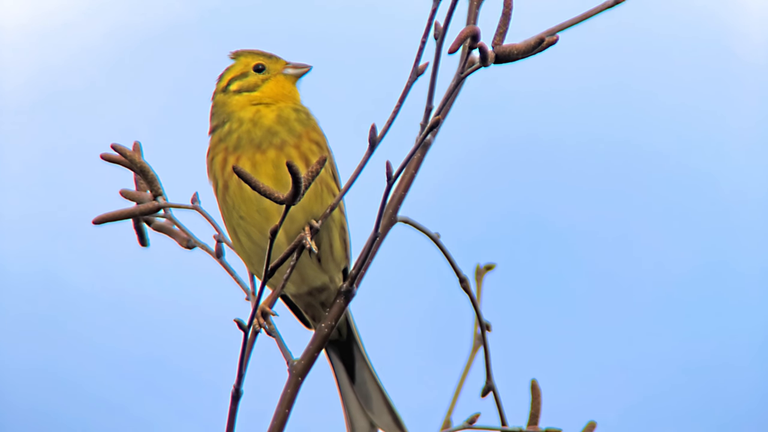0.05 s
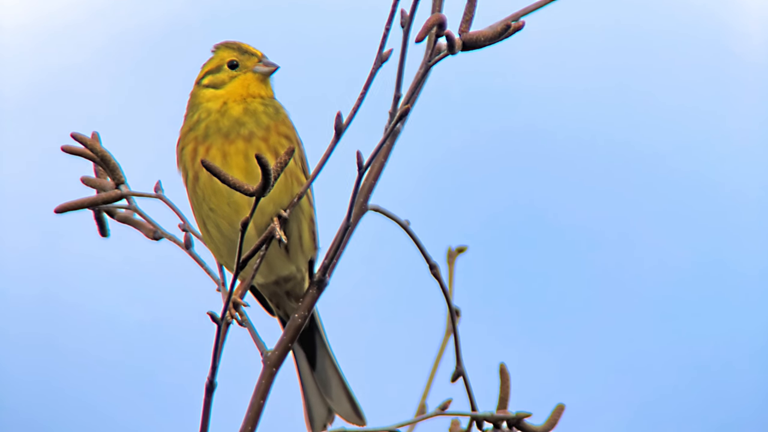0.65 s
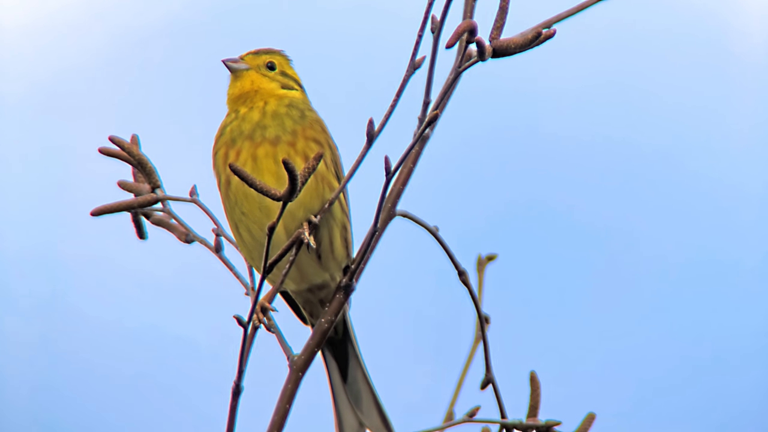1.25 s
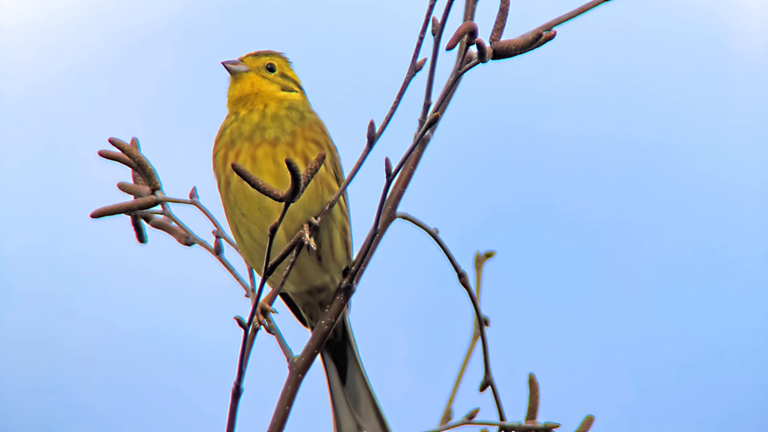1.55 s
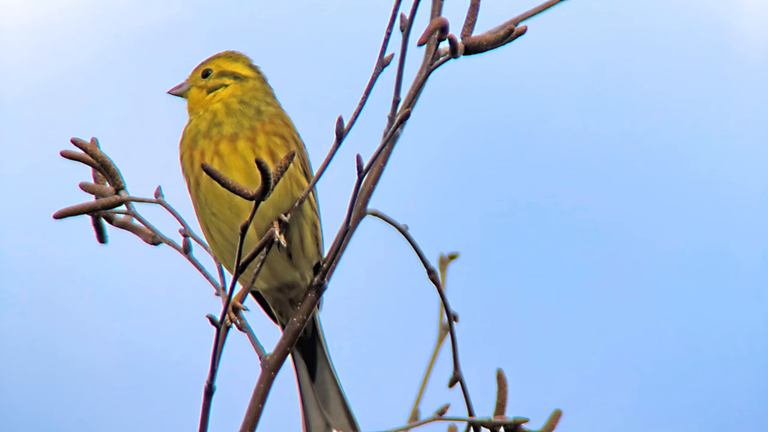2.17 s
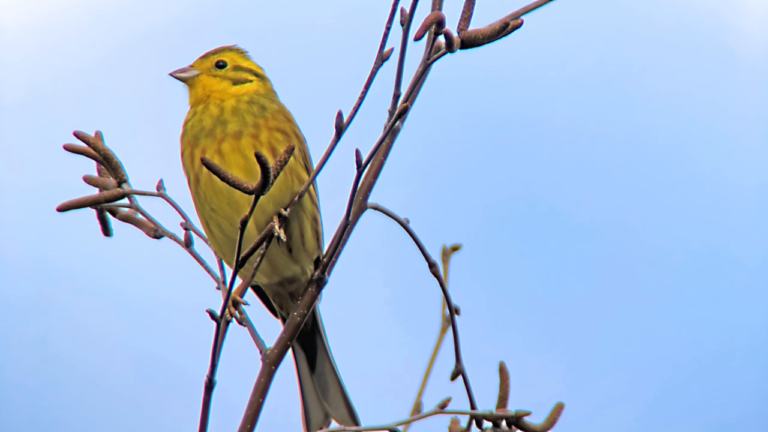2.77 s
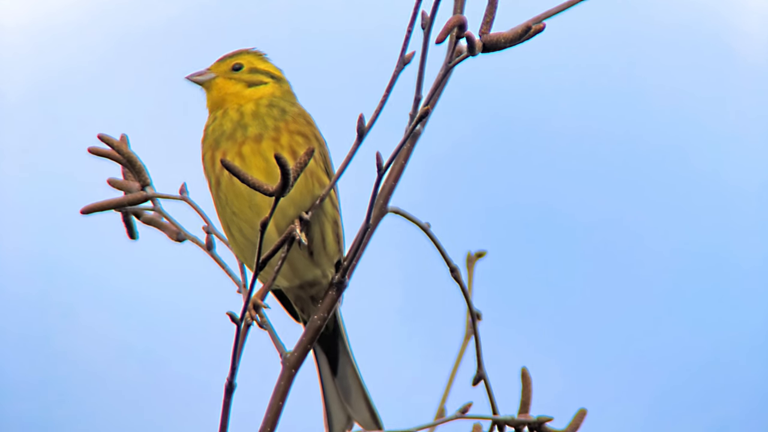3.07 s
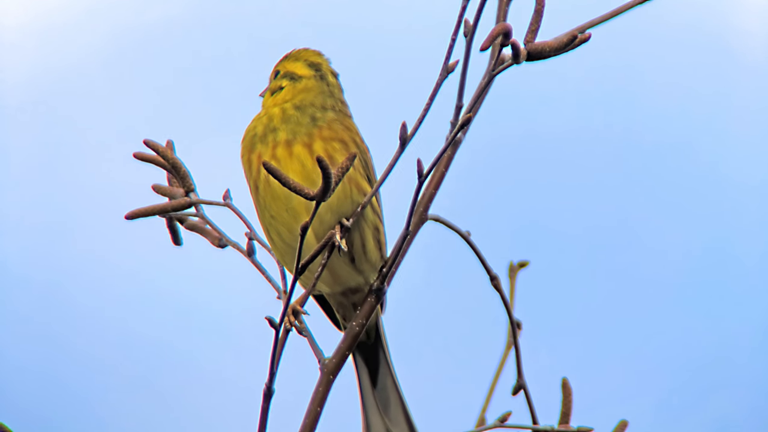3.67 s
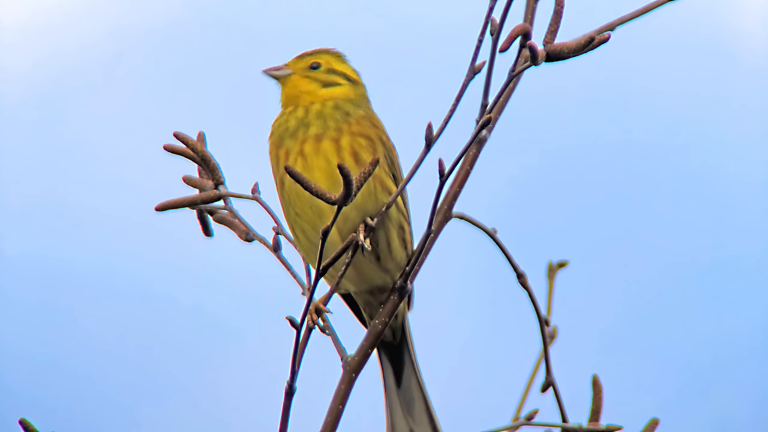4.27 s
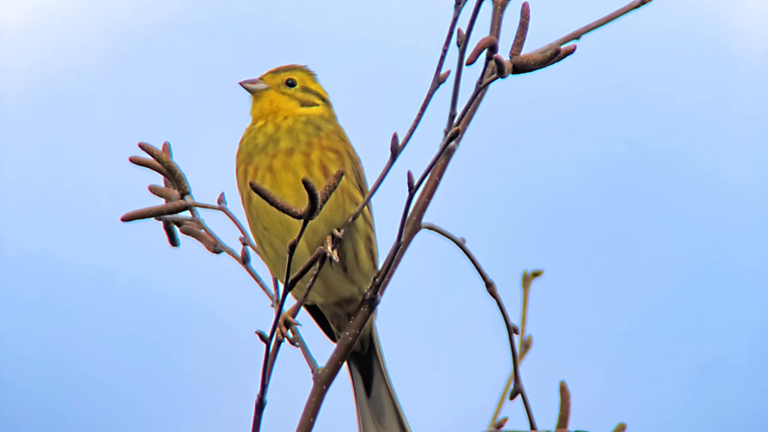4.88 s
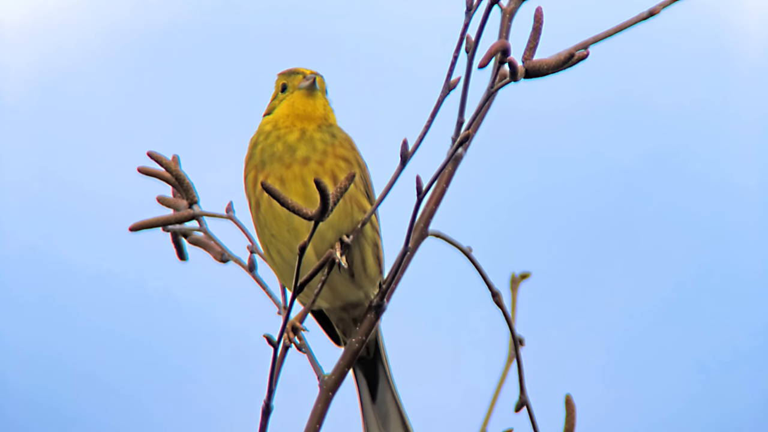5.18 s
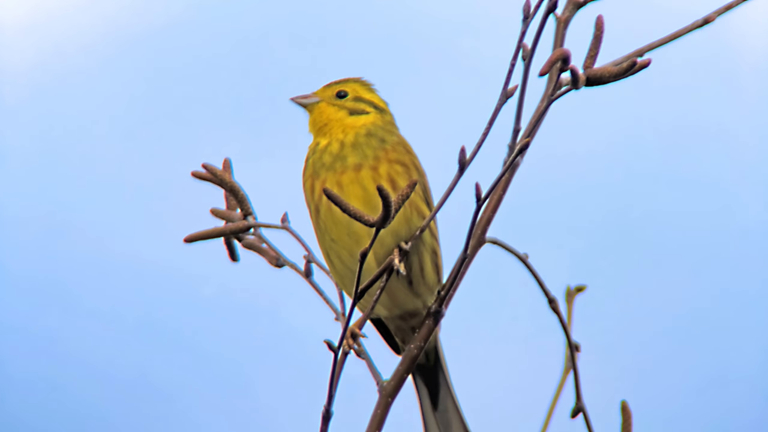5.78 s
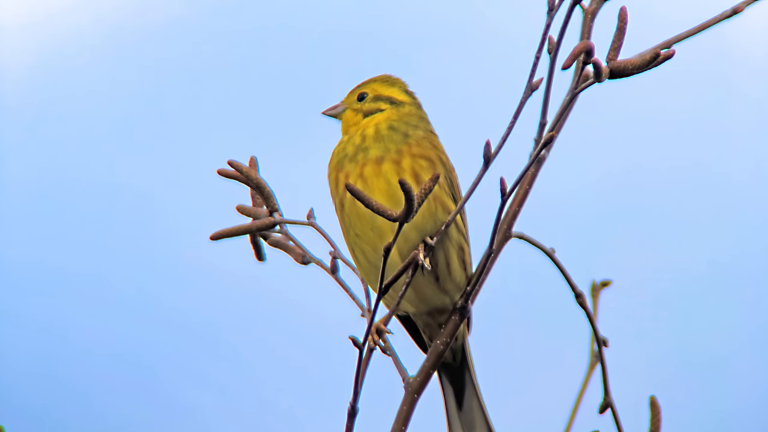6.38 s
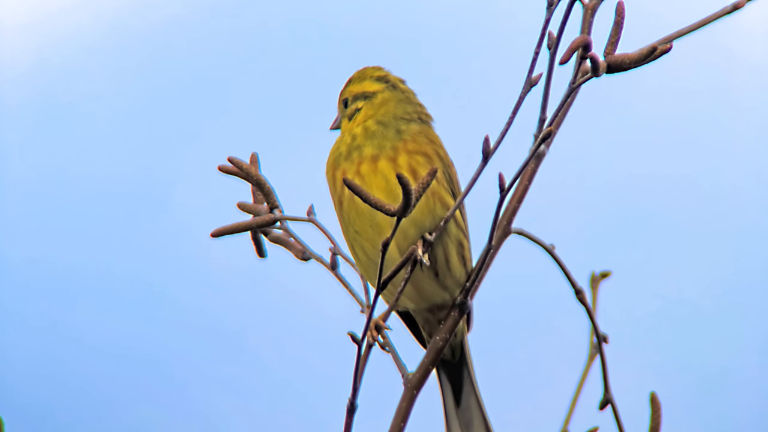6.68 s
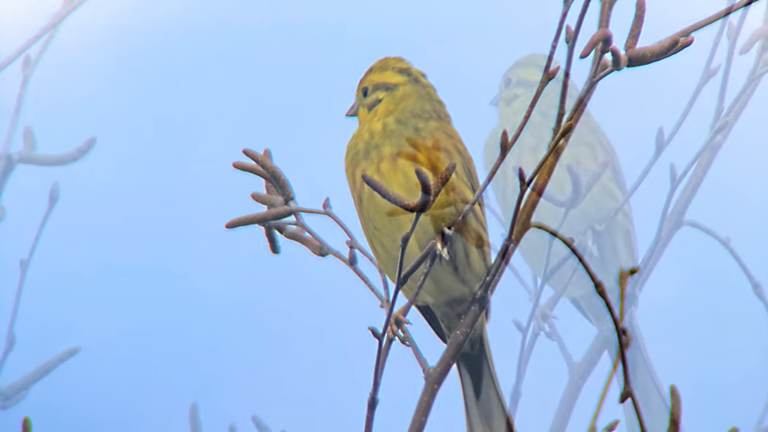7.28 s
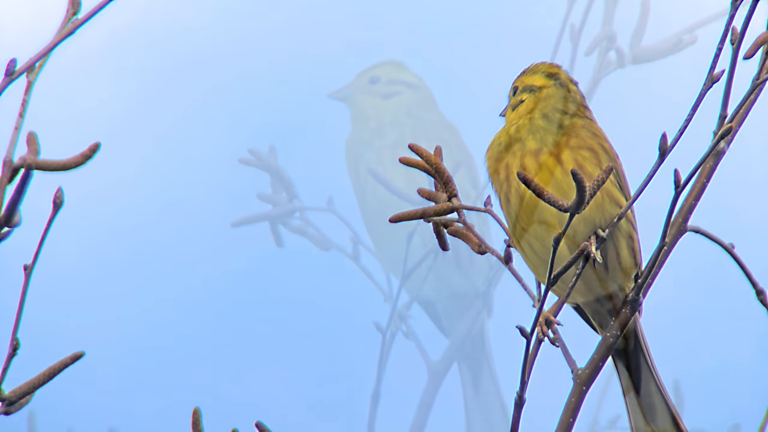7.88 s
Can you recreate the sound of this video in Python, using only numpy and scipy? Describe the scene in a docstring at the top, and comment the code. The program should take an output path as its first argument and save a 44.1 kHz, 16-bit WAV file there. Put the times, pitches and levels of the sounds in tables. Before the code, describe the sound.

A nearby bunting gives six brief buzzy calls, softly echoed by trees and picked up by a single microphone. In the pause after the first, two thin descending whistles and a rapid twitter come from birds further away. Throughout there is a far road, low wind with small puffs and a faint hiss. A distant engine drones louder around the middle, and a single dry click follows the last call.

```python
"""Outdoors among trees, a road far off, one mono microphone. Close by, a yellow bunting on a bare twig
gives six short buzzy calls; each is two beating voices, one from each side of its syrinx. Further off,
other birds add two thin falling whistles, a quick twitter and faint calls; the trees return a soft echo.
Under it lie distant traffic, a far engine's drone, low wind and microphone hiss.
One dry click comes near the end."""
import sys
import numpy as np
from scipy import signal
from scipy.fft import rfft, irfft
from scipy.io import wavfile

SR = 44100
rng = np.random.default_rng(int(sys.argv[2]) if len(sys.argv) > 2 else 0)


def generate_wav(sig):
    """Save sig (samples, or channels by samples) to the path in sys.argv[1] as 16-bit PCM at SR."""
    pcm = np.round(np.clip(np.atleast_2d(sig).T, -1, 1) * 32767).astype(np.int16)
    wavfile.write(sys.argv[1], SR, pcm)


N = 350154
TIME = np.arange(N) / SR

# colours of the wind, the tyres and the microphone: (frequency [Hz], relative density [dB])
WIND_SPECTRUM = [(12, -19.5), (24, -9), (35, -1.5), (48, 1), (62, -7), (80, -6), (102, -5.5), (125, -16),
                 (200, -36.5), (400, -69.5)]
ROAD_SPECTRUM = [(40, -34), (100, 10.5), (150, 7.5), (250, 4.5), (340, -0.5), (550, -0.5), (950, -2),
                 (1300, -9), (1800, -16), (2400, -24), (3500, -32), (6000, -41), (12000, -65)]
HISS_SPECTRUM = [(100, -8), (3000, -8), (6000, -5.5), (10000, -2), (13000, 0.5), (15700, 3)]
# puffs of wind: (peak time [s], length [s], rise of the deep part [dB])
WIND_PUFFS = [(0.41, 0.1, 6), (1.02, 0.21, 6), (2.85, 0.11, 10.5), (3.69, 0.33, 8.5), (4.167, .12, 8),
              (7.77, 0.19, 9)]
# far road and far engine: (time [s], level [dB])
ROAD_SWELLS = [(0, -44.5), (1.3, -42.5), (2.3, -41.5), (3.4, -41.5), (4.3, -42.5), (4.9, -40.5), (5.3, -42),
               (6.8, -42.5), (7.94, -43)]
ENGINE_SWELLS = [(0, -42.5), (1.3, -43), (2.05, -32), (2.6, -36), (3.05, -29.5), (3.73, -30.5),
                 (4.15, -39.5), (4.5, -30.5), (4.82, -24.5), (5.4, -31.5), (5.7, -25), (6.15, -37),
                 (6.4, -32.5), (7.1, -41), (7.94, -42.5)]
# engine speed: (time [s], firing rate [Hz])
ENGINE_FIRING = [(0, 56.97), (1.5, 59), (2, 61.48), (2.5, 59.94), (3.8, 60), (4.3, 61.55), (4.7, 59),
                 (5.8, 60), (6.5, 57), (7.94, 55.3)]

# gliding notes: (time [s], length [s], start pitch [Hz], end pitch [Hz], level before the mix [dB],
# settling [1; positive levels off, negative speeds up])
DISTANT_HUMS = [(0, 0.97, 107, 109, -42, 1), (1.75, 1.4, 191, 199.1, -48, 2),
                (2.66, 0.26, 552, 527, -51, 0.85)]
DISTANT_WHISTLE = [(2.68, .18, 2560, 2590, -65.5, 1)]
DISTANT_CHATTER = [(6.0, .08, 2510, 2676, -62.5, 0.91), (6.01, 0.066, 3400, 3300, -67, 1)]
THIN_WHISTLES = [(1.0, 0.35, 7520, 7280, -58.5, -1.14), (1.45, .425, 8280, 7180, -48.5, 1.5)]
WHISTLE_SNAP = [(1.431, 0.0052, 10200, 8560, -55, .5)]  # the sharp drop that opens the second whistle
# slurs of the twitter: (time [s], length [s], pitch at the turn [Hz], start above the turn [Hz],
# end above the turn [Hz], level before the mix [dB])
TWITTER_SLURS = [(1.959, 0.0194, 3450, 380, 900, -43.5), (1.97, 0.031, 2660, 350, -130, -53.5),
                 (1.981, 0.019, 3350, 50, 1600, -46.5), (2, 0.0168, 3630, -750, -500, -38.5),
                 (2.014, .020, 3035, 203, 750, -39.5), (2.032, 0.012, 3260, 490, 1150, -40),
                 (2.051, 0.041, 3195, -510, -650, -44.5), (2.092, 0.017, 3070, 0, 1850, -45.5),
                 (2.11, 0.021, 3560, -550, -780, -42.5), (2.143, 0.028, 3260, 780, 770, -45),
                 (2.174, .016, 3080, 160, -330, -49.5), (2.207, .028, 3170, 450, 850, -47),
                 (2.266, .028, 3200, 467, 590, -49.5), (2.3, 0.018, 2950, 200, -100, -56)]
# the near bunting: (time [s], settled pitch [Hz], opening above it [Hz], level [dB], length [s],
# attack [s], flick span [Hz], relative overtone level [dB], gain towards the trees [dB])
BUNTING_CALLS = [(0.185, 4400, 110, -44.5, 0.15, 0.034, 1830, -25.5, -1),
                 (2.548, 4470, 80, -45.5, .130, 0.04, 706, -37, 5),
                 (3.542, 4360, 482, -43.5, 0.13, 0.036, 800, -35, 4.5),
                 (4.623, 4307, 373, -40.5, .148, 0.039, 600, -41, 0.5),
                 (5.755, 4210, 306, -42.5, 0.14, 0.022, 1100, -37, 2.5),
                 (7.229, 4397, 200, -44.5, 0.12, 0.038, 1050, -36, 6)]


def undb(db):
    """Decibels to gain."""
    return 10 ** (np.asarray(db) / 20)


def unit(x):
    """Scale to an rms of 1."""
    return x / np.sqrt(np.mean(x ** 2))


def curve(rows):
    """Join (time, value) rows by straight lines across the scene."""
    return np.interp(TIME, *np.transpose(rows))


def walk(rate, size=N):
    """Smooth random wandering of spread 1, up to about rate turns a second."""
    hz = np.fft.rfftfreq(size, 1 / SR)
    lowpass = np.exp(-(hz / rate) ** 2) * (hz > 0)
    return unit(irfft(rfft(rng.standard_normal(size)) * lowpass, size))


def noise(spectrum):
    """Noise of rms 1 with the given colour."""
    hz, db = np.transpose(spectrum)
    gain = undb(np.interp(np.log(np.fft.rfftfreq(N, 1 / SR) + 1), np.log(hz), db))
    return unit(irfft(rfft(rng.standard_normal(N)) * gain, N))


def phase_of(hz):
    """Running phase of a moving frequency."""
    return 2 * np.pi * np.cumsum(hz) / SR


def add(out, start_s, x):
    """Mix a sound in at its time, with 1 ms soft edges."""
    i = int(start_s * SR)
    x = x * signal.windows.tukey(len(x), min(SR / 500 / len(x), 1))
    out[i:i + len(x)] += x[:N - i]


def tone(hz, db, waver, waver_rate, flicker_db):
    """A near-pure note whose pitch and level waver a little."""
    wavering_hz = hz * (1 + waver * walk(waver_rate, len(hz)))
    gain = undb(db + flicker_db * walk(waver_rate, len(hz)))
    return gain * np.sqrt(2) * np.sin(phase_of(wavering_hz))


def around(share, turn):
    """How far a note is before and after its turning point: 1 at its ends, 0 at the turn."""
    return np.maximum(1 - share / turn, 0), np.maximum((share - turn) / (1 - turn), 0)


def glides(rows, edge_db, waver, waver_rate, flicker_db, crest=0.35):
    """Notes that glide from one pitch to another, swelling to a crest and fading."""
    out = np.zeros(N)
    for start, length, start_hz, end_hz, db, settle in rows:
        share = np.linspace(0, 1, int(length * SR))
        hz = start_hz + (end_hz - start_hz) * np.expm1(-settle * share) / np.expm1(-settle)
        before, after = around(share, crest)
        add(out, start, tone(hz, db + edge_db * (before + after) ** 2, waver, waver_rate, flicker_db))
    return out


def microphone_hiss():
    """The microphone's own steady, bright noise floor."""
    return undb(-64.5) * noise(HISS_SPECTRUM)


def wind(breeze_db=-37.5, buffet_hz=58.5):
    """A low, steady breeze; each puff adds only deep buffeting."""
    puff_db = sum(rise * np.exp(-(2 * (TIME - at) / length) ** 2) for at, length, rise in WIND_PUFFS)
    buffet = signal.sosfilt(signal.butter(4, buffet_hz, fs=SR, output="sos"), noise(WIND_SPECTRUM))
    buffet *= np.sqrt(np.abs(undb(puff_db) ** 2 - 1))
    return undb(breeze_db + 0.5 * walk(3.4)) * (noise(WIND_SPECTRUM) + buffet)


def far_road():
    """Tyre roar from a far road, with faint passing hums in the distance."""
    tyres = noise(ROAD_SPECTRUM) * undb(curve(ROAD_SWELLS) + 0.57 * walk(7.3))
    return tyres + glides(DISTANT_HUMS, edge_db=-2, waver=0.012, waver_rate=12, flicker_db=1.5)


def far_engine():
    """A distant engine drones at its firing rate, swelling and throbbing."""
    firing_hz = curve(ENGINE_FIRING) + 0.5 * walk(6.3)
    level_db = curve(ENGINE_SWELLS) + 1.1 * walk(7)
    return undb(level_db) * np.sqrt(2) * np.sin(phase_of(firing_hz))


def click(at_s=7.6025, peak_db=-24, decay_s=0.0037):
    """A single dry click: a sudden step that relaxes."""
    age = TIME - at_s
    return undb(peak_db) * (age >= 0) * np.exp(-np.abs(age) / decay_s)


def trees(x, t60, build_s):
    """Trunks and branches scatter a sound into a diffuse tail that dies 60 dB in t60 seconds."""
    age = TIME[:SR]
    build_up = 1 - np.exp(-(age / build_s) ** 2)
    tail = rng.standard_normal(SR) * build_up * undb(-60 * age / t60)
    return signal.fftconvolve(x, tail / np.linalg.norm(tail))[:N]


def wood_edge(x, delay_s=0.29, highpass_hz=4500):
    """A far row of trees sends back one late, smeared echo; its thin twigs return mostly the top."""
    bright = signal.sosfilt(signal.butter(6, highpass_hz, "high", fs=SR, output="sos"), x)
    return np.interp(TIME - delay_s, TIME, trees(bright, t60=0.2, build_s=0.0071), left=0)


def far_birds():
    """Faint calls from far off reach the microphone only by way of the trees."""
    calls = glides(DISTANT_WHISTLE, edge_db=-4, waver=0.045, waver_rate=200, flicker_db=2.5)
    calls += glides(DISTANT_CHATTER, edge_db=-4, waver=0.06, waver_rate=120, flicker_db=2.5)
    return undb(-3.5) * trees(calls, t60=0.6, build_s=0.015)


def whistles():
    """Two thin falling whistles at middle distance, part direct and part scattered."""
    notes = glides(THIN_WHISTLES + WHISTLE_SNAP, edge_db=-16, waver=0.0034, waver_rate=130,
                   flicker_db=3, crest=0.62)
    return undb(-3) * notes + undb(-11.5) * trees(notes, t60=0.59, build_s=0.012)


def twitter(roundness=1.29, edge_db=-9.5):
    """A quick run of slurs at middle distance; each bends in pitch and is loudest at its turn."""
    slurs = np.zeros(N)
    for start, length, turn_hz, lead_hz, tail_hz, db in TWITTER_SLURS:
        before, after = around(np.linspace(0, 1, int(length * SR)), turn=0.36)
        hz = turn_hz + lead_hz * before ** roundness + tail_hz * after ** roundness
        level_db = db + edge_db * (before + after) ** 2
        add(slurs, start, tone(hz, level_db, waver=0.012, waver_rate=800, flicker_db=2.5))
    return undb(-0.5) * slurs + undb(-7.5) * trees(slurs, t60=0.72, build_s=0.012)


def flicks(age, rate_hz=122, peak_s=0.0235):
    """Upward flicks of pitch about every 8 ms, in a burst that peaks early and trails off."""
    flick_phase = phase_of(rate_hz * (1 + 0.015 * walk(66, len(age))))
    pulses = (0.5 - 0.5 * np.cos(flick_phase)) ** 2
    burst = (age / peak_s * np.exp(1 - age / peak_s)) ** 2.24
    return burst * (pulses - 0.25)


def syrinx(pitch_hz, lift_hz, gap_hz=289.4, swing_hz=272, flutter_hz=85, rough_db=1.2, rasp_db=-22):
    """Two voices, one from each side of the syrinx, beat into a buzz; returns a complex wave."""
    n = len(pitch_hz)
    share = np.arange(n) / n
    # both voices swing up and down together about once a beat, widest in mid-call
    swing = np.sin(phase_of(gap_hz * (1 + 0.13 * walk(68, n))))
    centre_hz = pitch_hz + swing_hz * np.sin(np.pi * share ** 0.94) ** 2 * swing
    lower_hz = centre_hz - gap_hz / 2 + 0.24 * lift_hz + flutter_hz * walk(260, n)
    upper_hz = centre_hz + gap_hz / 2 + lift_hz + flutter_hz * walk(260, n)
    upper_db = -3.7 - 10 * share ** 4  # the upper voice is weaker and fades towards the end
    lower = undb(-rough_db * walk(150, n)) * np.exp(1j * phase_of(lower_hz))
    upper = undb(upper_db - rough_db * walk(150, n)) * np.exp(1j * phase_of(upper_hz))
    # turbulent air shakes the membranes and frays the edges of the note
    rasp = undb(rasp_db) * (walk(1160, n) + 1j * walk(1070, n))
    return (lower + upper) * (1 + rasp)


def bunting(settle_s=0.05, release_s=0.032, edge_db=-24, sag_db_per_s=24):
    """The near bird, heard mostly direct; each call swells, sags a little and dies away."""
    direct, outward = np.zeros(N), np.zeros(N)
    for start, settled_hz, fall_hz, db, length, attack, flick_hz, overtone_db, send_db in BUNTING_CALLS:
        age = TIME[:int(length * SR)]
        onset = np.maximum(1 - age / attack, 0) ** 2
        release = np.maximum(1 - (length - age) / release_s, 0) ** 2
        effort_db = edge_db * (onset + release) - sag_db_per_s * (age - length / 2)
        pitch_hz = settled_hz + fall_hz * np.exp(-age / settle_s)
        voice = syrinx(pitch_hz, lift_hz=flick_hz * flicks(age))
        overtone = undb(overtone_db) * unit((voice ** 2).imag)
        call = undb(db + effort_db) * (unit(voice.imag) + overtone)
        add(direct, start, call)
        add(outward, start, undb(send_db) * call)  # what goes to the trees changes as the head turns
    twigs = undb(-13) * trees(direct, t60=0.09, build_s=0.004)
    tail = undb(-16.5) * trees(outward, t60=0.6, build_s=0.011)
    return direct + twigs + tail + undb(-31.5) * wood_edge(outward)


def scene():
    """Birds near and far over the open-air background, at one microphone."""
    birds = bunting() + whistles() + twitter() + far_birds()
    background = microphone_hiss() + wind() + far_road() + far_engine()
    return (birds + background + click())[None]


def record(dry, top_hz=15750):
    """The recorder cuts the top steeply."""
    return signal.sosfilt(signal.ellip(12, 0.1, 80, top_hz, fs=SR, output="sos"), dry)


dry = scene()
out = record(dry)
generate_wav(out)
```